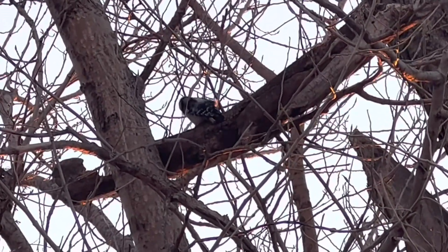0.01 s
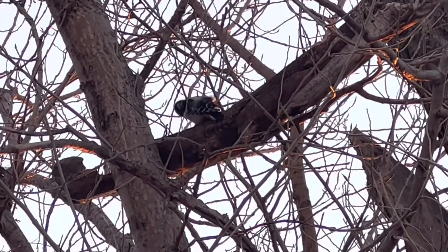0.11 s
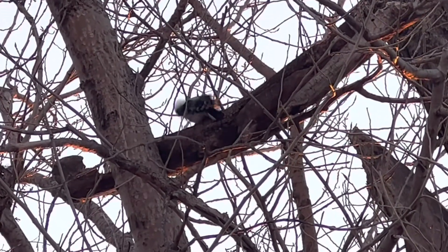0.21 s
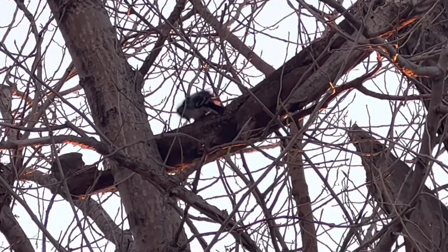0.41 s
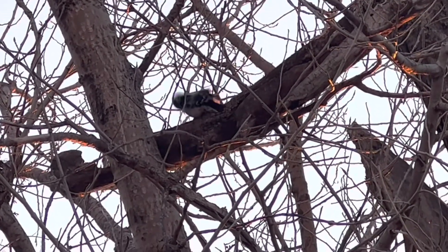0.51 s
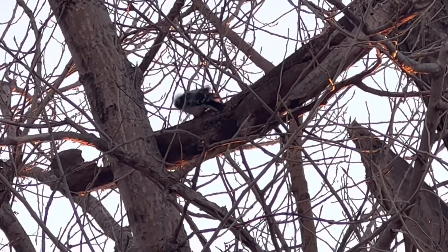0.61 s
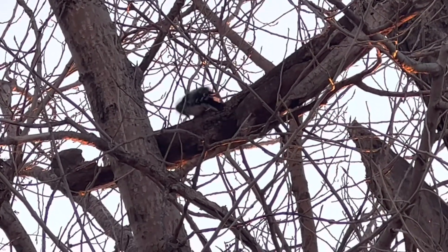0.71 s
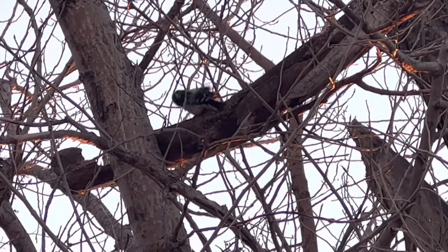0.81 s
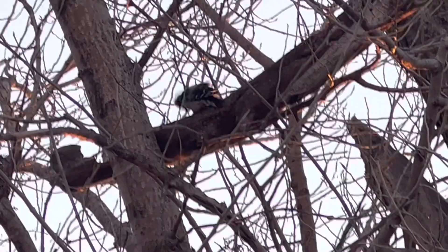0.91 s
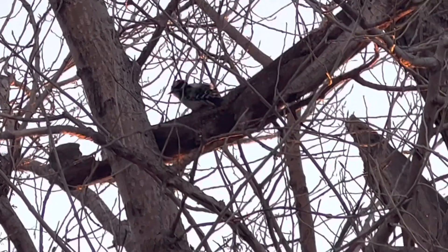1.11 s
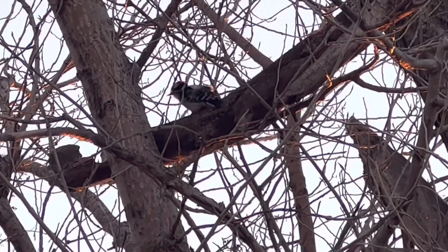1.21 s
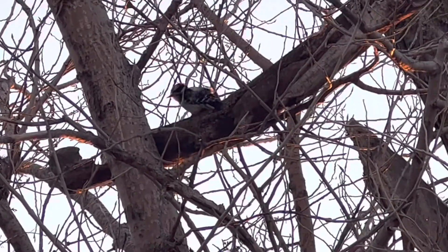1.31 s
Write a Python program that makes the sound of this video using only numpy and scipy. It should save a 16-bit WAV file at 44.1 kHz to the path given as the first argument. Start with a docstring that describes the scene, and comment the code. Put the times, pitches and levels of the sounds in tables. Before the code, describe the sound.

A woodpecker drums one fast hollow roll on a limb, then a distant bird trills buzzily

```python
"""A low airy rumble and a soft treble rustle run throughout: noise in third-octave bands, each flickering.
Birds whistle dry from the start as near-sine notes with bending pitch, among faint dry ticks of ringing and
grit. Then a woodpecker drums one roll on a bare limb: every blow cracks, rings the same wood modes and echoes
from afar. As the roll ends a far singer whistles and closes in a buzzy trill of falling chirps with a pulsing
upper voice."""
import sys
import numpy as np
from scipy import signal
from scipy.io import wavfile

SR = 44100
rng = np.random.default_rng(int(sys.argv[2]) if len(sys.argv) > 2 else 0)


def wav_out(sig):
    """Save sig, one row per channel (or a flat mono array), as 16-bit PCM at SR to the path in sys.argv[1]."""
    wavfile.write(sys.argv[1], SR, np.round(np.clip(np.atleast_2d(sig).T, -1, 1) * 32767).astype(np.int16))


N = 59535

# Spectrum of the low rumble: frequency_hz, relative density_db (per Hz)
AIR_SPECTRUM = [(25, -1), (55, -0.5), (120, -6.5), (260, -15.5), (620, -16), (1000, -19.5), (1800, -31.5),
                (2600, -25), (3400, -43.5), (5600, -41)]
# Spectrum of the treble rustle: frequency_hz, relative density_db (per Hz)
RUSTLE_SPECTRUM = [(2400, -12.5), (3300, -20.5), (4200, -15.5), (7000, -2), (8600, -36), (10300, -13.5),
                   (15000, -32)]
# Level of the treble rustle over time: time_s, level_db
RUSTLE_LEVEL = [(0, -73), (.3, -75), (.37, -77.5), (.53, -62), (.62, -83.5), (0.718, -66.5), (0.929, -69.5),
                (.98, -78), (1.228, -77), (1.35, -103)]
# Stereo likeness of the noise, clipped to -1 (opposite) .. 1 (identical): frequency_hz, likeness
STEREO_LIKENESS = [(60, 0.95), (290, 0.88), (640, -0.062), (1400, 0.12), (3100, 0.58), (7000, 1),
                   (9000, 0.079), (10500, -1.7), (15000, .3)]
# Whistled notes: start_s, length_s, start_hz, middle_hz, end_hz, level_db, roughness (0-1)
WHISTLE_NOTES = [(.0, 0.051, 3480, 3600, 3540, -78, 0.2), (0.158, 0.09, 2364, 2360, 2480, -61, 0),
                 (0.163, 0.033, 6900, 6480, 6430, -59.5, 0.2), (.641, .010, 2370, 3210, 2000, -46.5, 0.12),
                 (0.67, 0.04, 2230, 2225, 2250, -45, 0.14), (0.903, 0.063, 3445, 3250, 3170, -54, 0.3),
                 (0.938, 0.021, 4770, 4880, 5000, -64, 0.4), (0.971, 0.0063, 3670, 4030, 5240, -55, .05),
                 (0.974, 0.024, 4970, 4840, 4782, -40.5, 0), (0.987, 0.017, 2450, 2490, 2390, -55, .1),
                 (1.014, 0.0091, 3400, 3257, 2980, -40.5, 0.1),
                 (1.023, 0.0073, 6300, 4680, 3100, -47.5, 0.12)]
# Dry ticks: start_s, level_db (before the band filter), pitch_hz
DRY_TICKS = [(0.0443, -46.5, 7600), (0.0653, -48, 6840), (0.1092, -55, 7600), (0.1406, -54.5, 6800),
             (0.1649, -36, 7530), (0.2184, -52, 4800), (0.382, -36.5, 7220), (0.8249, -51.5, 6170),
             (0.8759, -44.5, 6880), (0.9104, -51, 4720), (1.1864, -50.5, 5400)]
# Blows of the bill: start_s, strength_db
BILL_BLOWS = [(0.2287, -5), (.2950, -2.5), (.3550, -2), (0.414, -0.65), (0.4723, -0.7), (.5325, 0.6),
              (.5930, 0.3), (.6539, 0.2), (0.7153, 1.5), (0.7773, -0.75), (.8390, -.8), (0.9029, 0),
              (0.9656, -1.1), (1.0298, -0.7)]
# Ringing modes of the limb: pitch_hz, level_db, t60_s, left_minus_right_db
LIMB_MODES = [(399.4, -44, 0.16, -2.3), (506.7, -34, 0.058, 5), (547, -24.5, 0.043, -1.5),
              (766, -41, 0.089, 7), (818.6, -29.5, 0.066, -4), (930, -29, .1, -.7),
              (1024.6, -31.5, 0.086, 7.8), (1120, -32, 0.057, 5), (1197, -35.5, 0.11, -9),
              (1326.4, -33, 0.065, 14.4), (1353, -29.5, 0.062, -4), (1586, -49.5, 0.089, -11.5),
              (2147, -49.5, 0.15, 3.2), (2475, -34, 0.021, -0.8), (680, -39, 0.071, -6.5)]

SONG_FROM_S = 0.9   # notes from here on belong to the far singer


def from_db(db):
    """Decibels to amplitude."""
    return 10 ** (np.asarray(db) / 20)


def rms_one(x):
    """Scale to an rms of 1."""
    return x / np.sqrt(np.mean(x ** 2) + 1e-20)


def at_hz(points, hz):
    """Read a frequency curve, interpolating along log frequency."""
    points = np.array(points)
    return np.interp(np.log(hz), np.log(points[:, 0]), points[:, 1])


def bandpass(x, order, low_hz, high_hz):
    """Butterworth band filter."""
    return signal.sosfilt(signal.butter(order, [low_hz, high_hz], "band", fs=SR, output="sos"), x)


def drift(rate_hz):
    """Random wander with spread 1: low-passed noise made at 1/40 of the sample rate."""
    step = 40
    pole = np.exp(-2 * np.pi * rate_hz * step / SR)
    noise = rng.standard_normal(N // step + 2002)
    slow = signal.lfilter([1], [1, -2 * pole, pole * pole], noise)[2000:]   # skip the filter's settling
    return np.interp(np.arange(N) / step, np.arange(len(slow)), rms_one(slow - slow.mean()))


def mid_side(mid, side, alike):
    """Mix two independent noises into left and right with the given likeness."""
    return np.sqrt(1 + alike) * mid + np.sqrt(1 - alike) * side * [[1], [-1]]


def banded_noise(spectrum, patchy_db):
    """Third-octave bands of stereo noise, each with its own level, flicker and likeness; rms 1."""
    out = 0
    shared_flicker = drift(9)
    edges_hz = 20 * 2 ** np.arange(0, 9.8, 1 / 3)
    white = rng.standard_normal((2, 2, N + 8000))   # neighbouring bands take turns on two noise pairs
    for k, (low_hz, high_hz) in enumerate(zip(edges_hz, edges_hz[1:])):
        hz = np.sqrt(low_hz * high_hz)
        if spectrum[0][0] < hz < spectrum[-1][0]:
            mid, side = bandpass(white[k % 2], 2, low_hz, high_hz)[:, -N:]
            alike = np.clip(at_hz(STEREO_LIKENESS, hz), -1, 1)
            flicker_db = patchy_db * (0.3 * shared_flicker + drift(32))
            out = out + from_db(at_hz(spectrum, hz) + flicker_db) * mid_side(mid, side, alike)
    return rms_one(out)


def air():
    """Steady low rumble of banded noise."""
    return from_db(-53.5) * banded_noise(AIR_SPECTRUM, patchy_db=1.82)


def rustle():
    """Treble noise whose level follows its own curve."""
    level_db = np.interp(np.arange(N) / SR, *np.transpose(RUSTLE_LEVEL))
    return from_db(level_db) * banded_noise(RUSTLE_SPECTRUM, patchy_db=4.6)


def whistles(notes):
    """Near-sine notes whose pitch bends along a parabola through three points."""
    edge = 0.14   # share of a note spent on each fade
    out, t = np.zeros(N), np.arange(N) / SR
    flutter = drift(150)
    for start, length, start_hz, middle_hz, end_hz, db, rough in notes:
        u = np.clip((t - start) / length, 0, 1)   # progress through the note
        hz = start_hz * (1 - u) * (1 - 2 * u) + 4 * middle_hz * u * (1 - u) + end_hz * u * (2 * u - 1)
        shape = np.sin(np.pi / 2 * np.minimum(np.minimum(u, 1 - u) / edge, 1))
        tone = np.sin(2 * np.pi * np.cumsum(hz) / SR)
        out += from_db(db) * shape * (1 + rough * flutter) * tone
    return out


def ticks():
    """Each tick is a very short ring mixed with grit, mostly the same in both channels."""
    t60_s, attack_s, grit_db = 0.012, 0.00027, -5
    out, age = np.zeros((2, N + 600)), np.arange(600) / SR
    grits = rng.standard_normal((len(DRY_TICKS), 3, len(age)))
    for (start, db, hz), grit in zip(DRY_TICKS, grits):
        rough = from_db(grit_db) * (grit[0] + 0.13 * grit[1:])   # shared grit plus a little per channel
        ring = np.sin(2 * np.pi * hz * age) + rough
        envelope = from_db(db - 60 * age / t60_s) * np.minimum(age / attack_s, 1)
        i = int(start * SR)
        out[:, i:i + len(age)] += envelope * ring
    return bandpass(out[:, :N], 1, 1500, 7500)


def scattered(x, t60_s, alike):
    """Diffuse stereo return: the sound smeared by dying noise."""
    t = np.arange(int(SR * 0.4)) / SR
    mid, side = rng.standard_normal((2, len(t))) * from_db(-60 * t / t60_s) * np.minimum(t / 0.012, 1)
    tail = np.sqrt(alike) * mid + np.sqrt(1 - alike) * side * [[1], [-1]]
    tail = tail / np.sqrt(np.sum(tail[0] ** 2))
    return signal.fftconvolve(x[None], tail, axes=1)[:, :N]


def crack():
    """Rough crack of the bill: a short burst of dying noise at every blow."""
    level_db, t60_s = -33.5, 0.13   # level before the band filter
    out, age = np.zeros(N), np.arange(SR // 20) / SR
    for (start, db), grit in zip(BILL_BLOWS, rng.standard_normal((len(BILL_BLOWS), len(age)))):
        i = int(start * SR)
        out[i:i + len(age)] += grit * from_db(db + level_db - 60 * age / t60_s)
    return bandpass(out + 1e-18, 2, 1600, 2693)


def limb_ringing():
    """Each blow builds up the limb's modes, which fall in step shortly after contact, the low ones later."""
    rise_s, rise_power = 0.0011, 2.79        # build-up time at 1 kHz; lower modes are slower by this power
    in_step_s, low_lag_s = 0.0023, 0.0013    # modes align here; extra lag an octave below 1 kHz
    spread_db, right_lag_s = 1.54, 0.00004   # random level per blow and mode; right channel's delay
    out, t = np.zeros((2, N)), np.arange(N) / SR
    spread = rng.normal(0, 1, (len(BILL_BLOWS), len(LIMB_MODES)))
    hz, level_db, t60_s, pan_db = np.transpose(LIMB_MODES)[:, :, None]
    align_s = in_step_s + low_lag_s * np.maximum(1000 / hz - 1, 0)
    build_s = rise_s * (1000 / hz) ** rise_power
    for (start, db), uneven in zip(BILL_BLOWS, spread):
        span = slice(int(start * SR), int(start * SR) + SR // 6)
        for channel, sign in enumerate((1, -1)):
            age = np.maximum(t[span] - start - channel * right_lag_s, 0)
            mode_db = db + level_db + sign * pan_db / 2 + spread_db * uneven[:, None]
            gain = from_db(mode_db - 60 * age / t60_s)
            ringing = -np.cos(2 * np.pi * hz * (age - align_s))
            rise = 1 - np.exp(-(age / build_s) ** 2)
            out[channel, span] += np.sum(gain * ringing * rise, axis=0)
    return out


def drumming():
    """The roll of ringing and cracks, one late echo, and a diffuse return from trunks and branches."""
    echo_s, echo_db = 0.118, -25
    blows = limb_ringing() + crack()
    echo = np.pad(blows, ((0, 0), (int(echo_s * SR), 0)))[:, :N]
    scatter = scattered(blows.mean(0), t60_s=0.15, alike=0.98)
    return blows + from_db(echo_db) * echo + from_db(-13) * scatter


def trill():
    """A buzz of quick, husky falling chirps, with a higher voice pulsing between them."""
    start_s, swell_s = 1.044, 0.04
    rate_hz, slowing_hz_per_s = 64.8, 10   # chirps per second at first; how fast that rate drops
    top_hz, end_hz, fall_s = 3450, 2570, 0.0024
    attack_s, dies_s = 0.0015, 0.016
    upper_hz, upper_swing_hz, upper_at = 5050, 130, 0.85   # upper pulse peaks this far through each cycle
    age = np.maximum(np.arange(N) / SR - start_s, 0)
    cycle = (rate_hz * age - slowing_hz_per_s / 2 * age ** 2) % 1
    since = cycle / rate_hz

    chirp_hz = end_hz + (top_hz - end_hz) * np.exp(-since / fall_s) + 80 * drift(200)
    chirp_shape = np.minimum(since / attack_s, 1) * (1 - cycle) * np.exp(-since / dies_s)
    chirps = chirp_shape * np.sin(2 * np.pi * np.cumsum(chirp_hz) / SR)

    pulse = np.cos(np.pi * (cycle - upper_at)) ** 4
    upper = pulse * np.sin(2 * np.pi * np.cumsum(upper_hz + upper_swing_hz * drift(400)) / SR)
    voices = from_db(-47.5 + 2 * drift(150)) * chirps + from_db(-56 + drift(60)) * upper
    return np.minimum(age / swell_s, 1) * voices


def far_singer():
    """Late whistles and the closing trill, with their diffuse return."""
    song = whistles([note for note in WHISTLE_NOTES if note[0] >= SONG_FROM_S]) + trill()
    return song + from_db(-4) * scattered(song, t60_s=0.3, alike=0.91)


def scene():
    """Layer the background, the early birds, the ticks, the drum roll and the song."""
    early_birds = whistles([note for note in WHISTLE_NOTES if note[0] < SONG_FROM_S])
    return air() + rustle() + early_birds + ticks() + drumming() + far_singer()


def record(dry):
    """Cut the deepest bass below 45 Hz and, steeply, the top by 16.9 kHz."""
    dry = signal.sosfilt(signal.butter(4, 45, "high", fs=SR, output="sos"), dry)
    return signal.sosfilt(signal.cheby2(12, 70, 16900, fs=SR, output="sos"), dry)


dry = scene()
out = record(dry)
wav_out(out)
```